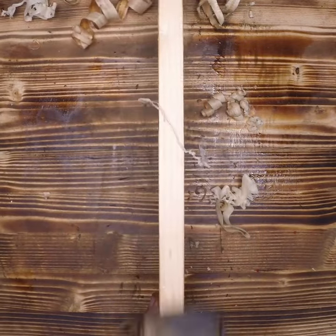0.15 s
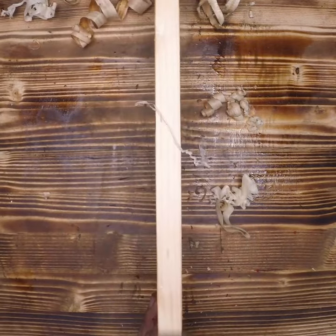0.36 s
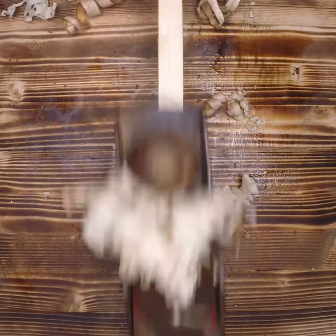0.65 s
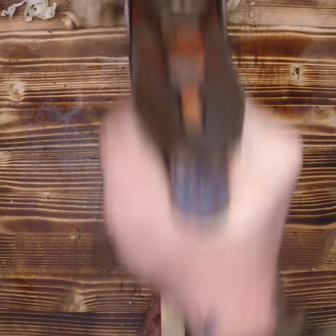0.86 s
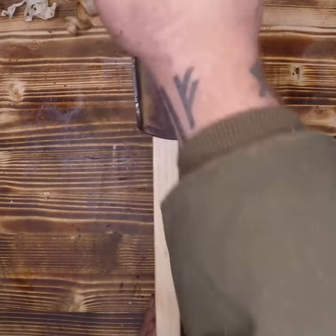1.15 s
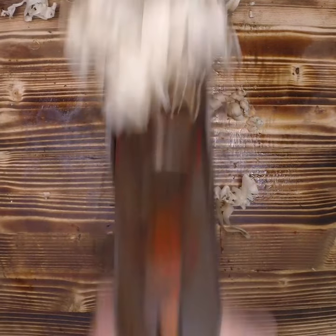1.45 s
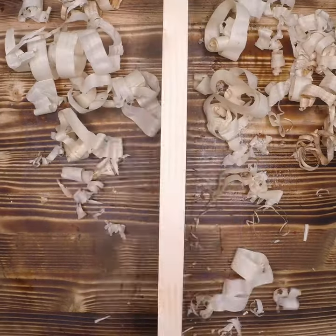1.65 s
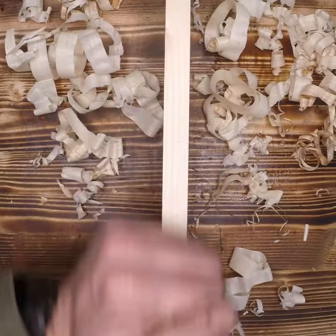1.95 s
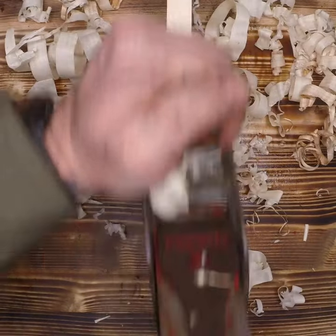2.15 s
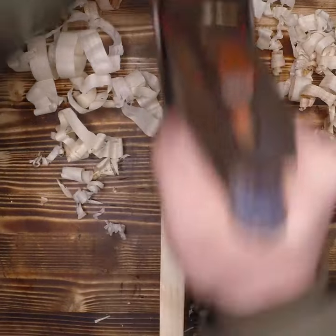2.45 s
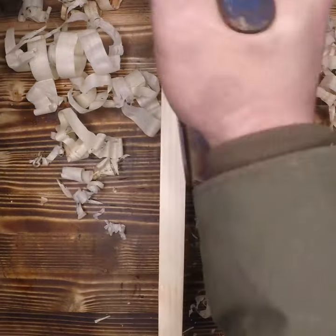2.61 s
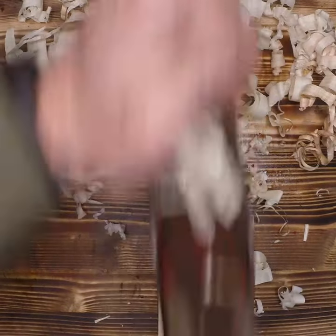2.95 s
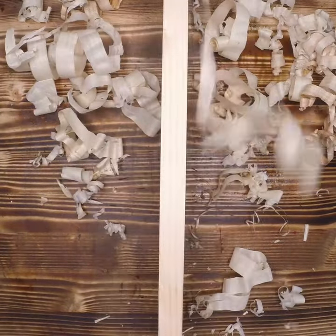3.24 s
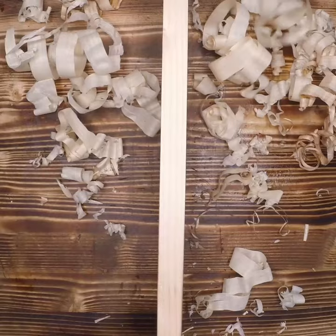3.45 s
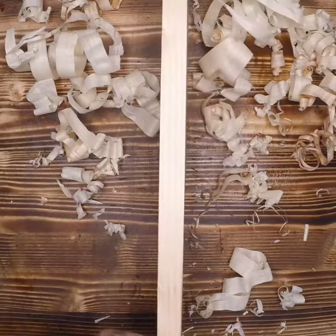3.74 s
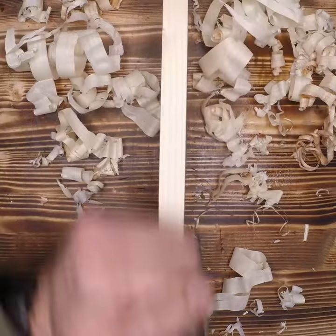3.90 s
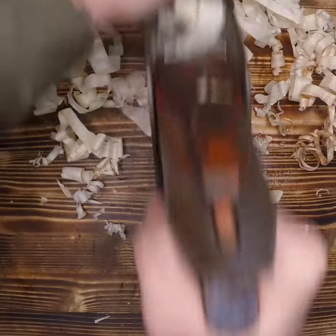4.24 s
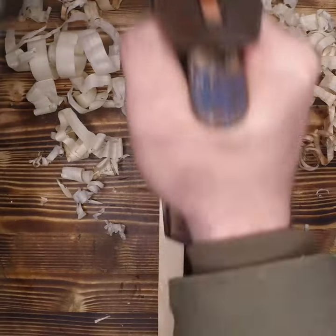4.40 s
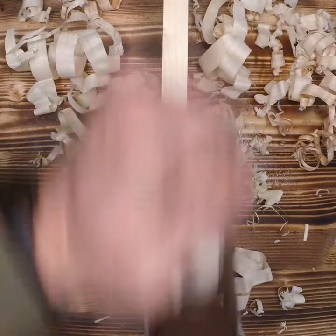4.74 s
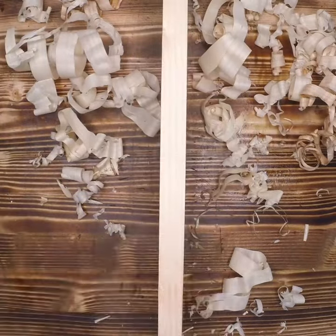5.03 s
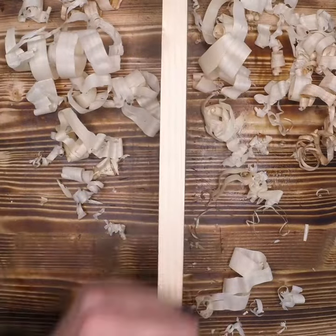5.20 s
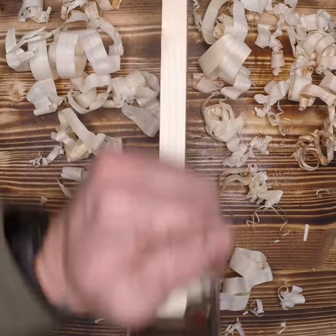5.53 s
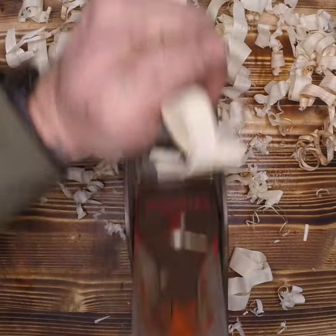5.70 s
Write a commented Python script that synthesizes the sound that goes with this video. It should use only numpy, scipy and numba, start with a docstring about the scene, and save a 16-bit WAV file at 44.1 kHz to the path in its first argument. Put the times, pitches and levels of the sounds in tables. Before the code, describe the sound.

Brisk woodworking strokes rasp and chatter over a thin board, shavings crackling faintly, with woody knocks and dull bench thuds between passes.

```python
"""A hand plane slides along a wooden board in strokes and short skids: stick-slip chatter of the iron,
made as random grains through a resonance of moving pitch, excites the modes of the board.
The rubbing sole hisses as coloured grains, shavings crackle and snap as bright noise, and knocks are brief
pitched pushes into the same modes. The bench adds low ringing thuds and a rumble of shaped noise;
a small workshop answers the plane through feedback delays, over faint still air."""
import sys
import numpy as np
from scipy import signal
from scipy.fft import rfft, irfft
from scipy.io import wavfile
from scipy.ndimage import uniform_filter1d
from numba import njit

SR = 44100
rng = np.random.default_rng(int(sys.argv[2]) if len(sys.argv) > 2 else 0)


def magnitude_from_level(level_db):
    """Linear magnitude for a level in decibels (20 dB per decade)."""
    exponent = np.asarray(level_db, float) / 20
    return 10 ** exponent


def store_wav(level_fs):
    """Save 16-bit WAV to argv[1]."""
    pcm = np.round(np.clip(np.atleast_2d(level_fs), -1, 1) * 32767)
    wavfile.write(sys.argv[1], SR, pcm.T.astype(np.int16))


N = 258426  # length in samples


def rms_one(x):
    """Normalisation: scale the mean power to 1."""
    return x / np.sqrt(np.mean(x ** 2) + 1e-20)


def in_time(rows):
    """Linear interpolation: each column after the time becomes one value per sample."""
    s, *columns = np.transpose(rows)
    now = np.arange(N) / SR
    return [np.interp(now, s, column) for column in columns]


def drift(corner_hz):
    """Low-passed noise: a slow random wander of rms 1, from two equal poles at the corner frequency."""
    every, settle = 40, 2000  # samples between slow values, slow values thrown away
    pole = np.exp(-2 * np.pi * corner_hz * every / SR)
    noise = rng.standard_normal(N // every + settle + 2)
    slow = signal.lfilter([1], [1, -2 * pole, pole * pole], noise)[settle:]
    return np.interp(np.arange(N) / every, np.arange(len(slow)), rms_one(slow))


def coloured(x, spectrum):
    """Spectral shaping: multiply by a gain in dB, joined by lines over log frequency."""
    hz, db = np.transpose(spectrum)
    log_hz = np.log(np.arange(N // 2 + 1) * SR / N + 1)
    return irfft(rfft(x) * magnitude_from_level(np.interp(log_hz, np.log(hz), db)), N)


def band_pass(x, low_hz, high_hz):
    """Band limitation: a second-order Butterworth band, scaled to rms 1."""
    sos = signal.butter(2, [low_hz, high_hz], "band", fs=SR, output="sos")
    return rms_one(signal.sosfilt(sos, x))


def ring(x, hz, t60):
    """Damped oscillator: a unit click rings as a sine of height 1 that falls 60 dB in t60 seconds."""
    r, w = magnitude_from_level(-60 / (t60 * SR)), 2 * np.pi * hz / SR
    return signal.lfilter([0, np.sin(w)], [1, -2 * r * np.cos(w), r * r], x + 1e-18)


@njit
def swept(x, hz, sharpness):
    """State-variable resonance: the centre moves sample by sample, the width is a fixed share of it."""
    out, low, mid = np.zeros(len(x)), 0.0, 0.0
    for i in range(len(x)):
        f = 2 * np.sin(np.pi * hz[i] / SR)
        low += f * mid
        mid += f * (x[i] - low - mid / sharpness)
        out[i] = mid / sharpness
    return out


def grains(per_s, spread_db):
    """Shot noise: fibres tear at random moments, with uneven strength where spread_db is above 0."""
    strength = magnitude_from_level(spread_db * np.minimum(rng.exponential(1, N), 4))
    sizes = strength * rng.choice([-1, 1], N)
    return rms_one(sizes * (rng.random(N) < per_s / SR))


def board(force, direct_db=-2, roam_db=0):
    """Modal superposition: every mode of the wood answers the force, over a plain radiated part.
    A contact that travels crosses each mode's nodes, so its grip on that mode swells and fades."""
    # modes of board and plane body: frequency_hz, relative_level_db, t60_s
    modes = [(297.5, -1.5, 0.078), (399.7, -11.5, 0.14), (535.2, -4.5, 0.071), (651.7, 2, 0.026),
             (701.3, -0.5, 0.062), (745, -2, 0.041), (867, 1.5, 0.021), (978, -6.5, 0.042),
             (1096, -8, 0.041), (1141, -7, 0.03), (1326.5, -7, 0.077), (1416, -8, 0.034),
             (1545, -10, 0.035), (1536, -1.5, 0.009), (1700, -0.5, 0.02), (1793, -14, 0.11),
             (1927, -7, 0.037), (1998, -8, 0.021), (2250, -39.5, 0.099), (2818, -23.5, 0.15),
             (3660, -17.5, 0.031), (4280, -23.5, 0.18)]
    rings = np.zeros(N)
    for k, (hz, db, t60) in enumerate(modes):
        grip = magnitude_from_level(roam_db * drift(6.34))
        rings += (-1) ** k * magnitude_from_level(db) * ring(force * grip, hz, t60)
    return rings / 20 + magnitude_from_level(direct_db) * force


def hiss(x):
    """Friction noise: the colour of rubbing wood, near rms 1 from 2.5 to 12 kHz for white noise of rms 1."""
    # friction spectrum, before that scaling: frequency_hz, relative_density_db
    friction_colour = [(250, -32), (600, -2.5), (1300, -3), (1950, 3.5), (2300, 9), (4300, -3.5),
                       (7000, -13.5), (10000, -32), (13000, -47), (15500, -23)]
    hz, db = np.transpose(friction_colour)
    grid = np.arange(2500, 12000, 50)
    density = magnitude_from_level(np.interp(np.log(grid), np.log(hz), db)) ** 2
    power = np.sum(density) * 100 / SR  # each 50 Hz step is a share 100 / SR of the whole band
    return coloured(x, friction_colour) / np.sqrt(power)


def contacts():
    """Sliding friction: strokes as listed, skids by a rule in which level and pitch fall after touchdown.
    Returns the contact tables with their tearing and rustle levels in dB."""
    # strokes along the board, one table each; the iron skips faster as the plane speeds up:
    # time_s, chatter_db, chatter_pitch_hz, hiss_db
    strokes = [
        [(0.0, -45, 690, -52.5), (.05, -55, 700, -52), (.25, -30.5, 1110, -50), (.33, -23.5, 474, -72),
         (.46, -58, 580, -109)],
        [(.47, -39.5, 896, -56.5), (.53, -22, 1110, -37), (.58, -20, 1010, -45), (.64, -18, 660, -43.5),
         (.685, -25.5, 740, -44), (.705, -17.5, 1310, -35.5), (.74, -22.5, 1320, -41), (.8, -54, 996, -34.5)],
        [(.8, -50, 1010, -42.5), (.88, -26.5, 1965, -38.5), (.99, -30.5, 1850, -38.5),
         (1.045, -18.5, 1335, -37.5), (1.08, -16.5, 832, -44.5), (1.112, -11.5, 547, -51),
         (1.2, -21.5, 502, -61.5), (1.3, -39.5, 490, -100)],
        [(1.322, -56, 2120, -51.5), (1.37, -58, 2000, -58), (1.42, -77.5, 1880, -41), (1.48, -66, 1960, -50.5),
         (1.54, -35, 1630, -48), (1.64, -43.5, 716, -52), (1.66, -54, 800, -103)],
        [(1.89, -15, 588, -58), (1.905, -12, 635, -56), (1.925, -8, 583, -59), (2.06, -14.5, 972, -37),
         (2.13, -21.5, 1370, -47), (2.2, -23.5, 1130, -42), (2.235, -13, 833, -39), (2.29, -10, 782, -49),
         (2.42, -17, 905, -45), (2.556, -30, 926, -41.5), (2.68, -20.5, 870, -47), (2.75, -49, 650, -70.5)],
        [(2.88, -49, 763, -58), (2.935, -50, 800, -54.5), (2.98, -55, 910, -42), (3.12, -45, 810, -41.5),
         (3.17, -29.5, 1650, -47), (3.235, -17.5, 1296, -43.5), (3.27, -17, 1116, -48), (3.38, -41, 960, -71)],
        [(4.0, -40.5, 1580, -45), (4.035, -26, 1860, -34.5), (4.095, -14.5, 1000, -55),
         (4.15, -20.5, 825, -43.5), (4.25, -37, 770, -51), (4.335, -54, 800, -54.5), (4.4, -26.5, 1020, -40.5),
         (4.425, -44, 903, -53), (4.52, -45.5, 700, -61)],
        [(4.55, -67.5, 726, -66), (4.75, -49.5, 700, -60.5), (4.9, -42, 695, -51.5), (4.96, -28, 1300, -53),
         (4.984, -20, 790, -62), (5.03, -38.5, 670, -62), (5.15, -52.5, 590, -92)],
        [(5.48, -38, 444, -85), (5.55, -24, 670, -82), (5.59, -14.5, 897, -49.5), (5.66, -21.5, 1100, -48.5),
         (5.73, -27, 1166, -43), (5.78, -23, 894, -45), (5.86, -22.5, 880, -51.5)],
    ]
    # what each stroke cuts: tearing_db (unpitched, re the chatter), rustle_db (papery, re the hiss)
    cuts = [(-10.5, -9), (-2.5, -20), (-20.5, -17), (2.5, -4.5), (-11.5, -14), (-7, -5), (-5, -13.5),
            (2, -11), (-9, -16.5)]
    # the sole touches down and skids to a stop: start_s, skid_length_s, chatter_db, pitch_hz, hiss_db
    skids = [(.396, 0.0057, -33.5, 650, -79), (1.763, 0.011, -12.5, 944, -34),
             (2.787, 0.041, -37, 770, -63), (3.555, 0.025, -14.5, 695, -37.5),
             (3.925, 0.032, -17.5, 1225, -31.5), (4.774, 0.021, -37, 1660, -48),
             (4.863, 0.011, -35.5, 1216, -49), (5.106, 0.0062, -37.5, 626, -80),
             (5.248, .035, -12.5, 1296, -33.5), (5.39, 0.032, -28.5, 620, -61)]
    lift_s, lift_db = 0.011, 6.5  # the weight comes off quickly
    tail_s, brake = 0.14, 0.46  # then the skid dies away while its pitch sags to this share
    chatter_fall, hiss_fall = 187, 520  # dB per s during the tail
    tables = list(strokes)
    tearing_db = [tearing for tearing, _ in cuts]
    rustle_db = [rustle for _, rustle in cuts]
    for s, hold, db, hz, hiss_db in skids:
        lift_end = s + hold + lift_s
        light_db, light_hiss_db = db - lift_db, hiss_db - lift_db
        light = (lift_end, light_db, hz, light_hiss_db)
        still = (lift_end + tail_s, light_db - chatter_fall * tail_s,
                 hz * brake, light_hiss_db - hiss_fall * tail_s)
        tables.append([(s, db, hz, hiss_db), (s + hold, db, hz, hiss_db), light, still])
        tearing_db.append(-4)
        rustle_db.append(-23.5)
    return tables, tearing_db, rustle_db


def lifted(tables, axis, extra_db=None):
    """Contact gating: gain of each table's dB column plus its own extra dB, silent off the wood."""
    edge_s = 0.002  # fade beyond either end
    gain, now = np.zeros((len(tables), N)), np.arange(N) / SR
    for k, table in enumerate(tables):
        s, db = np.transpose(table)[[0, axis]]
        inside_s = np.minimum(now - s[0], s[-1] - now)
        fade = np.clip(inside_s / edge_s + 1, 0, 1)
        extra = extra_db[k] if extra_db else 0
        gain[k] = fade * magnitude_from_level(np.interp(now, s, db) + extra)
    return gain


def passes():
    """Stick-slip excitation: chatter pitched by speed drives the board; the sole hisses through it too."""
    sharpness = 2.44  # of each chatter resonance
    tables, tearing_db, _ = contacts()
    pressure = lifted(tables, axis=1)
    pitches = np.array([in_time(table)[1] for table in tables])
    hz = pitches[pressure.argmax(axis=0), np.arange(N)]  # the firmest contact sets the pitch
    skips = grains(per_s=2800, spread_db=0)
    pitched = rms_one(swept(swept(skips, hz, sharpness), hz, sharpness))
    # each skip is lopsided, which adds an overtone near the octave
    even = grains(per_s=2500, spread_db=0)
    overtone = swept(swept(even, 1.9 * hz, sharpness), 1.95 * hz, sharpness)
    pitched += magnitude_from_level(-15) * rms_one(overtone)
    # the chatter is evened in level, so that its listed dB holds at every pitch
    pitched = pitched / np.sqrt(uniform_filter1d(board(pitched) ** 2, size=3000))

    torn = band_pass(grains(per_s=1500, spread_db=3.0), 597, 1870)
    torn = torn / np.std(board(torn))
    tearing = torn * lifted(tables, axis=1, extra_db=tearing_db).max(axis=0)

    lumps_db = 1.0 * drift(54)  # shared by chatter and, by half, the hiss
    chatter = (pitched * pressure.max(axis=0) + tearing) * magnitude_from_level(lumps_db - 6.5)
    hiss_gain = lifted(tables, axis=3).max(axis=0) * magnitude_from_level(0.5 * lumps_db + 2.9 * drift(24.6))
    rubbing = hiss(grains(per_s=7800, spread_db=3.0) * hiss_gain)
    return board(chatter + rubbing, direct_db=-3.0, roam_db=3.5)


def shavings():
    """Impulsive fracture noise: clumped bright crackle, and single snaps a few milliseconds long."""
    # shavings snapping: start_s, level_db (before the friction colour)
    snap_list = [(1.3246, -39), (1.364, -41.5), (1.492, -36.5), (1.5402, -25), (2.9824, -27.5),
                 (3.047, -31.5), (3.0995, -39), (3.501, -44.5)]
    tables, _, rustle_db = contacts()
    clumps = magnitude_from_level(5.4 * drift(22))
    crackle = band_pass(grains(per_s=2700, spread_db=0) * clumps, 3200, 8800)
    crackle = crackle * lifted(tables, axis=3, extra_db=rustle_db).max(axis=0)
    t, snaps = np.arange(600) / SR, np.zeros(N)
    for s, db in snap_list:
        rough = rng.standard_normal(len(t))
        snaps[round(s * SR):][:len(t)] += magnitude_from_level(db) * np.exp(-t / 0.0026) * rough
    return crackle + hiss(snaps)


def bench():
    """Forced low resonance: each thud is a firm shove with an uneven settling, over a lumpy rumble."""
    # weight shifting onto the bench: start_s, relative_level_db, pitch_hz
    thuds = [(0.087, -23.5, 136), (0.26, -25, 69), (0.342, -24.5, 105), (0.802, -18, 150),
             (1.585, -21.5, 131), (1.612, -26, 80), (1.807, -21.5, 90), (2.795, -26.5, 143),
             (3.24, -12.5, 85.3), (3.574, -7, 312), (3.915, -25, 51.4), (4.23, -28.5, 150),
             (4.393, -29.5, 112), (4.546, -35, 198), (4.682, -28.5, 95), (4.801, -29.5, 109),
             (4.973, -12.5, 220.5), (5.224, -28.5, 69.6), (5.46, -24.5, 145), (5.566, -20, 310)]
    # low rumble, before its random lumps: time_s, level_db
    rumble_level = [(0.0, -47), (0.26, -33), (0.59, -40.5), (1.5, -42), (1.8, -40), (2.46, -44.5),
                    (3.3, -40), (4.29, -46.5), (4.7, -45.5), (5.86, -45)]
    # spectrum of the rumble: frequency_hz, relative_density_db
    rumble_colour = [(12, -38.5), (20, 5.5), (49, 1.5), (87, -10.5), (139, -3), (367, -13), (500, -7),
                     (650, -16.5), (1100, -120)]
    t60 = 0.1  # s, of the main partial
    out, t = np.zeros(N), np.arange(6000) / SR
    for s, db, hz in thuds:
        settling = magnitude_from_level(db - 33) * np.exp(-t / 0.048) * rng.standard_normal(len(t))
        shove = magnitude_from_level(db - 38.5) * np.exp(-t / 0.00094)
        push = np.zeros(N)
        push[round(s * SR):][:len(t)] = settling + shove
        out += ring(push, hz, t60)
        out += 1.64 * ring(push, 1.6 * hz, 0.32 * t60)
        out += 0.24 * ring(push, 1.1 * hz, t60)
    out = signal.sosfilt(signal.butter(2, 400, fs=SR, output="sos"), out)
    rumble = rms_one(coloured(rng.standard_normal(N), rumble_colour))
    return out + rumble * magnitude_from_level(in_time(rumble_level)[0] + 2.0 * drift(3))


def still_air():
    """Stationary random noise: a faint steady background of fixed colour."""
    # spectrum of the air: frequency_hz, relative_density_db
    air_colour = [(200, 3.5), (650, 8), (1500, -1), (3000, -16), (6000, -27.5), (15000, -38)]
    return magnitude_from_level(-50.5) * rms_one(coloured(rng.standard_normal(N), air_colour))


def shop(x):
    """Reverberation: twelve feedback delays, duller on every round, stepped one delay length at a time."""
    t60_s, wall_cut_hz = 0.42, 3500
    out, dull = np.zeros(N), np.exp(-2 * np.pi * wall_cut_hz / SR)
    lags = (np.geomspace(0.011, 0.037, 12) * SR).astype(int)
    for k, lag in enumerate(lags):
        loop, state = x.copy(), [0.]
        gain = magnitude_from_level(-60 * lag / SR / t60_s)
        for i in range(lag, N, lag):
            block = loop[i - lag:i]
            back, state = signal.lfilter([gain * (1 - dull)], [1, -dull], block, zi=state)
            loop[i:i + lag] += back[:N - i]
        out += (loop - x) * (-1) ** k  # echoes only
    return out


def scatter(x, lag_s, share):
    """Allpass diffusion: tools and shelves smear each echo without colouring it."""
    taps = np.zeros(int(lag_s * SR) + 1)
    taps[0], taps[-1] = 1, -share
    return signal.lfilter(taps[::-1], taps, x)


def knocks():
    """Impact excitation: a short rough push, pitched by the stiffness of the contact, into the board."""
    # knocks and catches of the iron: start_s, relative_level_db, pitch_hz
    blows = [(1.106, -19, 517), (1.186, -25, 558), (1.534, -24, 1584), (1.765, -7.5, 637), (1.78, -10, 747),
             (1.922, -5.5, 630), (2.336, -13.5, 658), (2.405, -16.5, 815), (3.231, -11.5, 1420),
             (3.245, -13, 517), (3.555, -10.5, 658), (3.585, -11, 634), (3.948, -9, 1277),
             (4.036, -12, 1785), (4.976, -18, 1343), (5.253, -14.5, 750), (5.277, -20, 1400)]
    sharpness, size = 0.94, 2000  # of the rough part; samples per push
    force, t = np.zeros(N), np.arange(size) / SR
    envelope = np.minimum(t / 0.002, 1) * np.exp(-t / 0.0028)
    for s, db, hz in blows:
        centre = np.full(size, float(hz))
        rough = swept(swept(rng.standard_normal(size), centre, sharpness), centre, sharpness)
        push = np.sin(2 * np.pi * hz * t) + 0.32 * rms_one(rough)
        force[round(s * SR):][:size] += magnitude_from_level(db + 1) * envelope * push
    return board(force)


def scene():
    """Superposition: plane and board with the room's answer, the bench, and the still air."""
    plane = passes() + shavings() + knocks()
    room = scatter(scatter(shop(plane), 0.0017, 0.6), 0.0047, 0.6)
    mix = plane + magnitude_from_level(-22.5) * room + bench() + still_air()
    return mix[None]


def low_pass(x):
    """Removes everything above the highest recorded frequency."""
    return signal.sosfilt(signal.butter(12, 15300, fs=SR, output="sos"), x)


def record(dry):
    """High-pass and saturation: the microphone drops the deepest bass; peaks are gently rounded."""
    heard = signal.sosfilt(signal.butter(4, 32, "high", fs=SR, output="sos"), dry)
    rounded = 0.95 * np.tanh(heard / 0.95)
    return low_pass(rounded)


dry = scene()
out = record(dry)
store_wav(out)
```